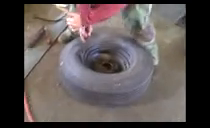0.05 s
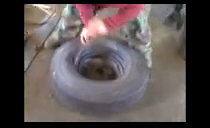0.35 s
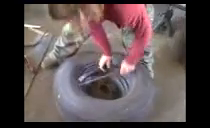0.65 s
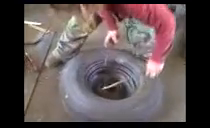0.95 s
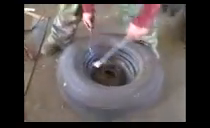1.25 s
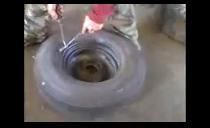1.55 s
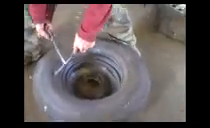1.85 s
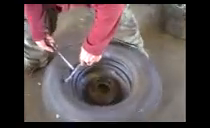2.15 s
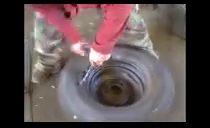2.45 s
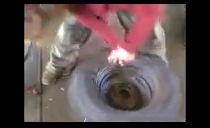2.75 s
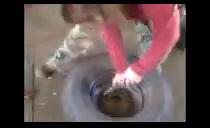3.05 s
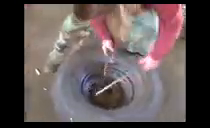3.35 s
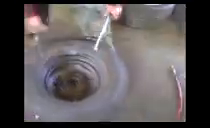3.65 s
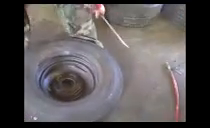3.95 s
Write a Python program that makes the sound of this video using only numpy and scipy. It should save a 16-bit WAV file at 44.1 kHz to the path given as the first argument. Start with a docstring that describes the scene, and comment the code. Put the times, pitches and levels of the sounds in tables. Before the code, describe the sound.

Tire irons clank and scrape on a rim, rubber juddering, then a loud squealing rasp.

```python
"""Two steel tire irons lever a tire over its rim on a concrete workshop floor.
The irons clank and scrape on the rim, while the rubber sticks and slips in thuds and a low judder.
At last the bead (the tire's stiff inner edge) slides over the rim's lip with a loud rasp and a squeal,
and the jolted wheel rings. Boots and clothes rustle, and the shop echoes over a faint, steady hiss."""
import sys
import numpy as np
from scipy import signal
from scipy.fft import rfft, irfft, next_fast_len
from scipy.io import wavfile
from scipy.ndimage import map_coordinates

SR = 44100
rng = np.random.default_rng(int(sys.argv[2]) if len(sys.argv) > 2 else 0)


def output_pcm(signal):
    """Save a mono or channel-first signal as 16-bit PCM at the path in sys.argv[1].

    Samples are clipped to [-1, 1] before scaling.
    """
    pcm = np.clip(np.atleast_2d(signal).T, -1, 1) * 32767
    wavfile.write(sys.argv[1], SR, np.round(pcm).astype(np.int16))


N = 176400  # 4 seconds

# Levels in dB are relative. A ring time (t60) is how long a sound takes to fade by 60 dB.
# How loudly boots and clothes rustle. Each row: time in seconds, level in dB.
RUSTLE_LEVELS = [(0, -71), (.9, -46.5), (1.15, -49), (1.6, -57), (2.1, -82), (2.7, -48), (3.45, -80.5),
                 (3.7, -52), (4, -41)]
# The tone of that rustle. Each row: frequency in Hz, level in dB.
RUSTLE_SPECTRUM = [(100, -3), (500, 2.5), (1100, -8.5), (1650, 1.5), (2100, 7.5), (3500, 1.5), (6500, 10.5),
                   (8500, -22.5)]
# Rubber slipping on the rim. Each row: start in seconds, level in dB, pitch in Hz.
RUBBER_SLIPS = [(.087, -32, 133), (0.225, -16, 112), (0.244, -24, 210), (0.259, -30, 127), (.316, -14, 104),
                (0.344, -38, 89), (.368, -19, 116), (.403, -16, 124.5), (0.43, -13, 94.5), (.439, -30, 210),
                (0.469, -15.5, 105), (0.499, -42, 195), (0.534, -24, 136), (.580, -28.5, 182),
                (0.606, -22.5, 106), (0.646, -34.5, 130), (1.209, -28, 166), (1.72, -15.5, 143.5),
                (1.746, -25, 112), (2.805, -21.5, 138), (2.867, -14.5, 133), (2.896, -26, 109),
                (2.916, -24.5, 146), (3.066, -5, 155.5), (3.09, -14.5, 208), (3.124, -1, 116.4),
                (3.152, -8.5, 225.5), (3.225, -13.5, 138)]
# The tones in one thud. Each row: multiple of the pitch, level in dB.
THUD_TONES = [(.62, -6), (1.001, 1.5), (1.75, -8)]
# Rubber dragged over the rim, one list for each pull. Each row: time in seconds, level in dB.
JUDDER_PULLS = [
    [(.22, -72.5), (.235, -18), (.3, -38.5), (.45, -31), (.56, -36.5), (.67, -38), (.74, -62.5)],
    [(2.86, -50), (2.93, -31.5), (3.0, -41), (3.07, -36.5)],
]
# The shaking body of the tire. Each row: frequency in Hz, level in dB.
JUDDER_SPECTRUM = [(25, -34.5), (48, -25), (65, -8), (120, 2.5), (190, -6.5), (250, 2.5), (340, -31),
                   (600, -34.5), (1500, -44)]
# Iron and rubber rubbing. Each row: start in seconds, length in seconds, level in dB,
# brightness in dB per octave, resonance in Hz, boost at that resonance in dB.
SCRAPE_STROKES = [(0.224, 0.026, -32.5, -7.5, 600, 10.5), (0.258, 0.32, -43.5, -6.5, 6500, 21),
                  (0.489, 0.027, -39.5, -1, 6200, 2), (0.509, 0.04, -33, -.5, 6200, 5.5),
                  (0.558, 0.048, -38, 0.5, 2600, 3.5), (0.607, 0.056, -40.5, -1, 6400, 3),
                  (1.055, 0.077, -41.5, -3.5, 650, 7), (1.295, 0.14, -45.5, -1.5, 6200, 9),
                  (1.389, 0.39, -43, 1.5, 5800, 0.5), (1.472, 0.049, -39.5, -0.5, 3300, 4),
                  (2.285, 0.26, -41.5, -1, 2700, 3.5), (2.32, 0.041, -32, -0.5, 800, 5.5),
                  (2.916, 0.011, -25.5, -4, 2500, -5), (2.975, 0.058, -43, -17, 6000, -2),
                  (3.68, .17, -52.5, -2.5, 1650, 18), (3.903, .03, -35, -1, 3000, 10),
                  (3.939, .1, -38.5, 1.3, 3100, 9), (3.917, 0.013, -35, -8, 453, 25),
                  (3.921, 0.014, -29, 1, 2900, 14)]
# The basic tone of rubbing. Each row: frequency in Hz, level in dB.
SCRAPE_SPECTRUM = [(100, 8), (400, 3), (1100, -2), (2800, -1.5), (6200, 0.5), (8500, -10.5)]
# An iron hits the rim. Each row: start in seconds, which iron, level in dB, ring time in seconds,
# brightness in dB per octave, the wheel's thud in dB relative to the hit.
IRON_HITS = [(0.7412, "short", -4.5, 0.051, -1.5, -17), (0.8183, "short", -9.5, 0.045, -2, -12),
             (1.248, "long", -24, 0.043, -4.5, -10.5), (1.376, "long", -19, 0.049, -3.7, -8),
             (1.777, "long", -35.5, 0.18, -4.5, 9), (1.809, "long", -7, 0.032, -1, -15.5),
             (2.076, "long", -9, 0.047, -1.43, -9), (2.405, "long", -27, 0.058, -8, -0.5),
             (2.663, "short", -40, 0.072, -1, -27), (2.866, "short", -37, 0.14, -2.5, -19.5),
             (2.9323, "short", -11.5, 0.046, -0.4, -10), (2.95, "short", -18.5, 0.078, 1.5, -10),
             (3.126, "long", -0.5, 0.028, -2.5, -5.5), (3.1602, "short", -5.5, 0.057, -1.5, -33),
             (3.179, "short", -11.5, 0.094, 6.5, -9.5), (3.197, "short", -14.5, 0.037, 6, -22)]
# The tones of the short and the long iron held against the rim. Each row: frequency in Hz, level in dB.
HELD_IRON_TONES = {"short": [(1495, -8.5), (2320, -10.5), (2605, -4), (2880, -6), (3300, 0.5), (3945, -3.5),
                   (4750, -2.5), (4960, -2), (5330, -8), (5700, -25.5), (5830, 2.5), (6050, -10.5),
                   (6400, -1), (7270, -7.5)], "long": [(770, -4), (1455, -6.5), (1680, -8.5), (1850, 3),
                   (1970, -1.5), (2080, -5.5), (2300, -13.5), (3200, 3), (3445, 2.5), (3700, -2),
                   (4780, -3), (5000, -23.5), (5815, -12.5), (6265, 6)]}
# The iron's bounces within one clank. Each row: delay in seconds, level in dB.
BOUNCES = [(0, -0.5), (.0055, -10), (.012, -13.5)]
# The sharp crack of steel on steel. Each row: frequency in Hz, level in dB.
CRACK_SPECTRUM = [(150, -12), (400, -7), (1100, -5.5), (2000, -3), (4200, 1), (6000, 7), (7200, 1.5),
                  (8500, -9)]
# How loudly an iron groans under load. Each row: time in seconds, level in dB.
GROAN_LEVELS = [(2.29, -51), (2.34, -48.5), (2.42, -42), (2.52, -44), (2.58, -50.5), (2.64, -62)]
# The tones in the groan. Each row: multiple of the pitch, level in dB.
GROAN_HARMONICS = [(1, 4), (2, 1.5), (3, -8)]
# How loudly the bead slides over the rim's lip. Each row: time in seconds, level in dB.
RASP_LEVELS = [(3.062, -78), (3.071, -34), (3.088, -23), (3.11, -18), (3.135, -6.5), (3.18, -16),
               (3.21, -20.5), (3.3, -22), (3.4, -54.5)]
# The tone of that slide. Each row: frequency in Hz, level in dB.
RASP_SPECTRUM = [(25, -19.5), (55, -18), (150, 14), (300, -1.5), (420, 7), (600, 0), (1100, -1), (2500, 0),
                 (4000, 2.5), (5700, 4), (7000, 2), (8500, -4)]
# Steel squealing on steel. Each row: start in seconds, rise time in seconds, level in dB, pitch in Hz.
STEEL_SQUEALS = [(3.092, 0.024, -13, 2803), (3.122, 0.02, -17.5, 4754)]
# Blows that ring the freed rim. Each row: start in seconds, level in dB.
RIM_BLOWS = [(3.126, -21), (3.159, -28.5), (3.226, -25)]
# The tones of the steel rim. Each row: frequency in Hz, level in dB, ring time in seconds.
RIM_TONES = [(103.7, 2.5, 0.27), (141.6, -5.5, .4), (213.5, 5, 0.24), (256, 0, 0.19), (397, -10, .35),
             (507, -6, 0.47), (540, -8.5, 0.9), (1430, -9, 1), (1462, -20, 0.96), (2114, -11.5, 0.47),
             (2808, -22, .5), (5480, -4.5, .4), (5700, -4, .4), (6440, -7, 0.76)]
# An iron springs free. Each row: start in seconds, level in dB, ring time in seconds.
IRON_RECOILS = [(3.2245, -4, 0.043)]
# The tones of the freed iron. Each row: frequency in Hz, level in dB.
FREE_IRON_TONES = [(1400, -7), (1490, -2.5), (2067, -7.5), (4980, -5.5), (5238, -3), (5420, -0.5),
                   (5720, -3)]
# How long the shop echoes. Each row: frequency in Hz, ring time in seconds.
ECHO_TIMES = [(100, 0.68), (500, 0.63), (1500, .8), (4000, .68), (8000, 0.62)]
# How strongly the shop echoes. Each row: frequency in Hz, level in dB.
ECHO_LEVELS = [(80, -23.5), (200, -6), (600, -2), (2000, -7.5), (6000, -9), (8500, -10.5)]
# The shop's steady hiss and rumble. Each row: frequency in Hz, level in dB.
HISS_SPECTRUM = [(15, -35.5), (25, 5), (63, -6.5), (93, -4), (252, -9), (321, -25), (510, -13.5),
                 (1080, -20.5), (1640, -23), (2040, -21.5), (5540, -18.5), (8370, -26.5), (10900, -43.5),
                 (18400, -120)]

TOP_HZ = 8600  # treble limit
GRAIN_DB, PRESSURE_DB, PRESSURE_PER_S = 3, 1.37, 94  # how rough and uneven the rubbing is
THUD_ATTACK_S, THUD_T60_S = 0.0048, 0.052
CLANK_ATTACK_S, WHEEL_HZ = 0.00048, 154


def amp(db):
    """Turn decibels into a factor to multiply by."""
    return 10 ** (np.asarray(db) / 20)


def unit(x):
    """Scale a sound to an average (rms) level of 1."""
    return x / np.sqrt(np.mean(x ** 2) + 1e-20)


def along(points, hz):
    """Read between (Hz, value) points on a logarithmic frequency scale."""
    freqs, values = np.transpose(points)
    return np.interp(np.log(hz + 1), np.log(freqs + 1), values)


def seconds(length):
    """The time of each sample in a sound of this length."""
    return np.arange(int(length * SR)) / SR


def swell(rows):
    """A loudness curve through (seconds, dB) points, silent outside them."""
    return amp(np.interp(np.arange(N) / SR, *np.transpose(rows), left=-120, right=-120))


def wobble(t, per_s):
    """A smooth curve through per_s random values each second."""
    return map_coordinates(rng.standard_normal(4096), [t * per_s], mode="wrap")


def tilt(hz, slope):
    """The dB that brighten or dull a sound by slope dB per octave, pivoting at 4000 Hz."""
    return slope * np.log2(np.maximum(hz, 300) / 4000)


def noise(spectrum, size, slope=0):
    """Noise shaped to a spectrum, at an average level of 1."""
    hz = np.fft.rfftfreq(size, 1 / SR)
    gain = amp(along(spectrum, hz) + tilt(hz, slope)) * (hz < TOP_HZ)
    return unit(irfft(rfft(rng.standard_normal(size)) * gain, size))


def dying(t, t60):
    """A fade that drops 60 dB every t60 seconds."""
    return np.exp(-np.log(1000) * t / t60)


def ring(t, hz, db, t60, detune=0):
    """Struck steel rings with several fading tones, mixed a little differently at each blow."""
    level_draw, pitch_draw, phase = rng.standard_normal((3, len(hz), 1))
    gain = amp(db[:, None] + 0.83 * level_draw)
    waves = np.sin(2 * np.pi * (hz[:, None] * (1 + detune * pitch_draw) * t + phase))
    fades = dying(t, np.reshape(t60, (-1, 1)))
    return np.sum(gain * waves * fades, 0) / np.sqrt(np.sum(gain ** 2) / 2)


def add(track, start, sound):
    """Mix a sound into the track at start seconds."""
    part = track[int(start * SR):][:len(sound)]
    part += sound[:len(part)]


def rustle():
    """Boots and clothes rub softly under uneven pressure."""
    cloth = noise(RUSTLE_SPECTRUM, N)
    pressure = amp(PRESSURE_DB * wobble(np.arange(N) / SR, PRESSURE_PER_S))
    return swell(RUSTLE_LEVELS) * unit(cloth * pressure)


def thud(t, hz):
    """One soft bounce of the rubber, which dies away quickly."""
    body = sum(amp(db) * np.sin(2 * np.pi * hz * multiple * t) for multiple, db in THUD_TONES)
    attack = 1 - np.exp(-(t / THUD_ATTACK_S) ** 2)
    return 2 * body * attack * dying(t, THUD_T60_S)


def rubber_slips(rub_db=-24):
    """The rubber sticks and slips: each slip is a thud with a faint rub."""
    out, t = np.zeros(N), seconds(0.5)
    for start, db, hz in RUBBER_SLIPS:
        rub = amp(rub_db) * noise(SCRAPE_SPECTRUM, len(t), slope=0.5) * dying(t, THUD_T60_S)
        add(out, start, amp(db) * (thud(t, hz) + rub))
    return out


def judder():
    """The tire shakes with a low rumble as it is dragged over the rim."""
    return sum(map(swell, JUDDER_PULLS)) * noise(JUDDER_SPECTRUM, N)


def scrapes(rise_s=0.008, fall_s=0.025, width_octaves=0.33):
    """Iron and rubber rub under uneven pressure, making short strokes of grainy noise."""
    out, t = np.zeros(N), seconds(0.5)
    hz = np.geomspace(50, TOP_HZ, 200)
    for start, length, db, bright, peak_hz, boost_db in SCRAPE_STROKES:
        resonance = boost_db * np.exp(-(np.log2(hz / peak_hz) / width_octaves) ** 2)
        spectrum = np.c_[hz, along(SCRAPE_SPECTRUM, hz) + resonance]
        stroke = np.clip(t / rise_s, 0, 1) * np.clip((length - t) / fall_s + 0.5, 0, 1)
        grain = amp(GRAIN_DB * wobble(t, per_s=700) + PRESSURE_DB * wobble(t, PRESSURE_PER_S))
        add(out, start, amp(db) * stroke * unit(noise(spectrum, len(t), bright) * grain))
    return out


def clanks(graze_lead_s=0.0027, graze_db=-17, steel_db=-4, crack_db=-1):
    """An iron grazes the rim, thuds the wheel and bounces, cracking and ringing at each touch."""
    out, t = np.zeros(N), seconds(0.25)
    attack = 1 - np.exp(-t / CLANK_ATTACK_S)
    for start, iron, db, t60, bright, thud_db in IRON_HITS:
        hz, levels = np.transpose(HELD_IRON_TONES[iron])
        graze = noise(SCRAPE_SPECTRUM, len(t)) * dying(t, t60)
        add(out, start - graze_lead_s, amp(db + graze_db) * graze)
        add(out, start, amp(db + thud_db) * thud(t, WHEEL_HZ))
        for delay, bounce_db in BOUNCES:
            # the grip shifts the iron's tones a little
            steel = amp(steel_db) * ring(t, hz, levels + tilt(hz, bright), t60, detune=0.013)
            crack = amp(crack_db) * noise(CRACK_SPECTRUM, len(t), bright) * dying(t, t60)
            add(out, start + delay, amp(db + bounce_db) * attack * (steel + crack))
    return out


def groan(pitch_hz=867, jitter=0.038, jitters_per_s=130):
    """A loaded iron creeps over the rubber with an unsteady pitch."""
    t = np.arange(N) / SR
    hz = pitch_hz * (1 + jitter * wobble(t, jitters_per_s))
    phase = 2 * np.pi * np.cumsum(hz) / SR
    tone = sum(amp(db) * np.sin(multiple * phase) for multiple, db in GROAN_HARMONICS)
    grain = amp(GRAIN_DB * wobble(t, jitters_per_s))
    return swell(GROAN_LEVELS) * unit(tone * grain)


def bead_rasp(grain_db=2.5):
    """The bead slides over the rim's lip in a swell of rough noise."""
    grain = unit(amp(grain_db * wobble(np.arange(N) / SR, per_s=350)))
    return swell(RASP_LEVELS) * grain * noise(RASP_SPECTRUM, N)


def squeals(release_t60_s=0.11, waver_radians=0.45):
    """Steel slides on steel: a high, wavering tone builds up and then fades."""
    out, t = np.zeros(N), seconds(0.75)
    for start, rise, db, hz in STEEL_SQUEALS:
        grip = np.minimum(t / rise, 1) * dying(np.maximum(t - rise, 0), release_t60_s)
        phase = 2 * np.pi * hz * t + waver_radians * wobble(t, per_s=300)
        add(out, start, np.sqrt(2) * amp(db) * grip * np.sin(phase))
    return out


def rim_ring():
    """The wheel jolts, and the freed rim rings like a bell."""
    out, t = np.zeros(N), seconds(0.75)
    for start, db in RIM_BLOWS:
        add(out, start, amp(db) * ring(t, *np.transpose(RIM_TONES), detune=0.0013))
    return out


def recoil():
    """An iron springs free and rings briefly."""
    out, t = np.zeros(N), seconds(0.25)
    attack = 1 - np.exp(-t / CLANK_ATTACK_S)
    for start, db, t60 in IRON_RECOILS:
        add(out, start, amp(db) * attack * ring(t, *np.transpose(FREE_IRON_TONES), t60))
    return out


def shop_echo(sound, build_s=0.004):
    """The hard walls echo: each half second of sound gets its own tail of fading noise."""
    out, size = np.zeros(N), SR // 2
    for first in range(0, N, size):
        hz, t, bands = signal.stft(rng.standard_normal(SR), SR, nperseg=256)
        fade = dying(t, along(ECHO_TIMES, hz)[:, None]) * (1 - np.exp(-t / build_s))
        fade /= np.sqrt(SR * np.mean(fade ** 2, 1, keepdims=True))  # equal energy in each band
        gain = amp(along(ECHO_LEVELS, hz))[:, None]
        _, tail = signal.istft(bands * fade * gain, SR, nperseg=256)
        add(out, first / SR, signal.fftconvolve(sound[first:first + size], tail))
    return out


def scene(low_cut_hz=34, hiss_db=-47):
    """The work at the wheel, which gives off no deep bass, plus its echo and the shop's steady hiss."""
    work = clanks() + recoil() + scrapes() + rustle() + groan() + rubber_slips() + judder()
    work += bead_rasp() + squeals() + rim_ring()
    work = signal.lfilter(*signal.butter(2, low_cut_hz, "high", fs=SR), work)
    return (work + shop_echo(work) + amp(hiss_db) * noise(HISS_SPECTRUM, N))[None]


def record(dry, ceiling=0.93):
    """The loudest blows overload and are rounded off, and the highest treble is cut away."""
    clipped = dry / (1 + np.abs(dry / ceiling) ** 6) ** (1 / 6)
    size = next_fast_len(N + SR // 2)
    kept_band = np.fft.rfftfreq(size, 1 / SR) < TOP_HZ
    return irfft(rfft(clipped, size) * kept_band, size)[:, :N]


dry = scene()
out = record(dry)
output_pcm(out)
```